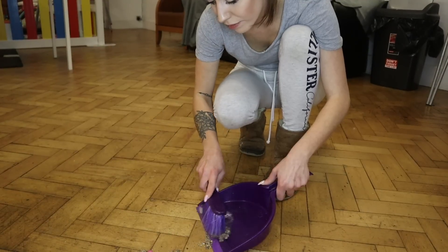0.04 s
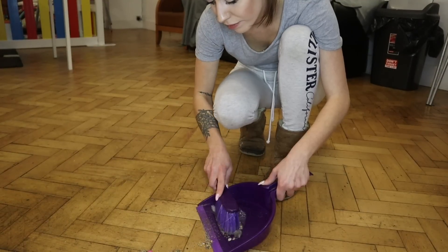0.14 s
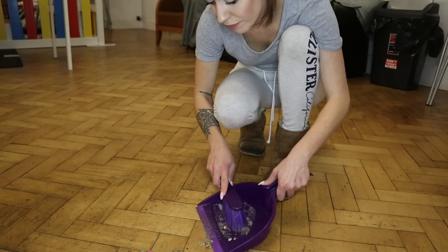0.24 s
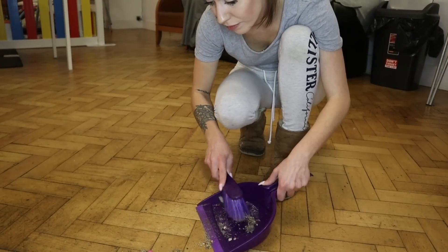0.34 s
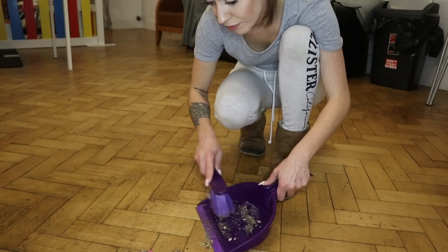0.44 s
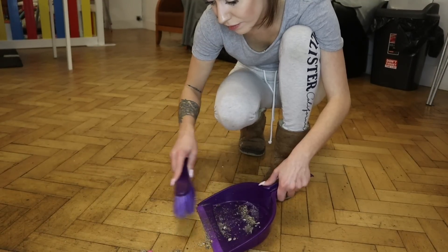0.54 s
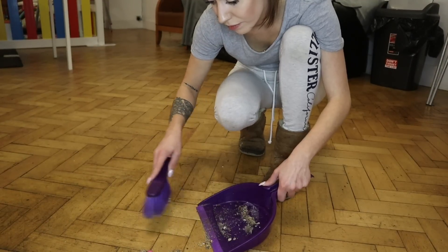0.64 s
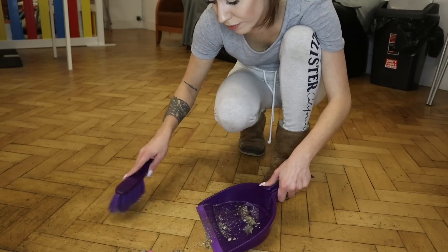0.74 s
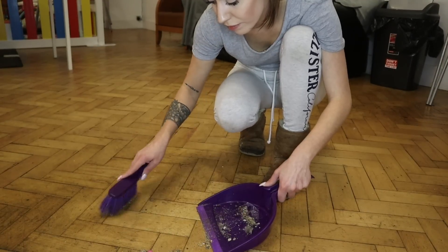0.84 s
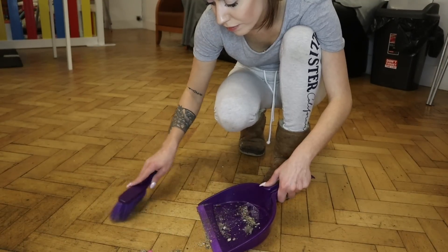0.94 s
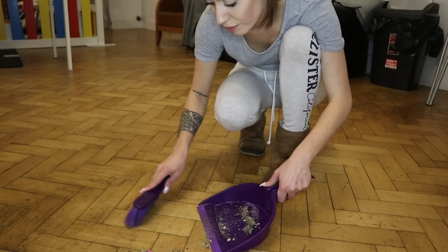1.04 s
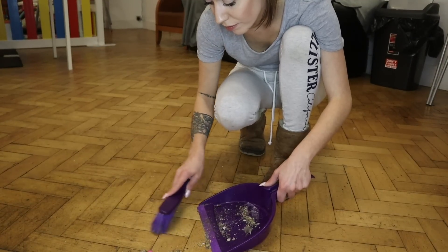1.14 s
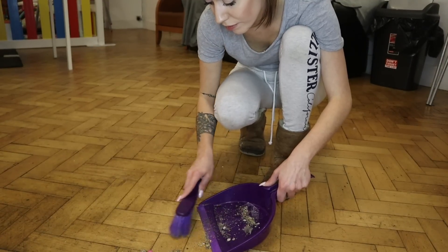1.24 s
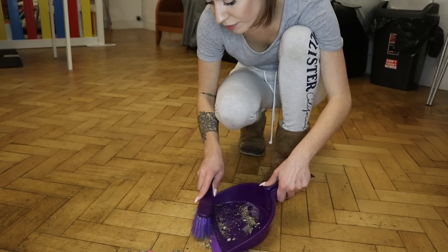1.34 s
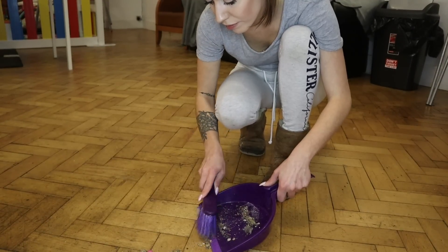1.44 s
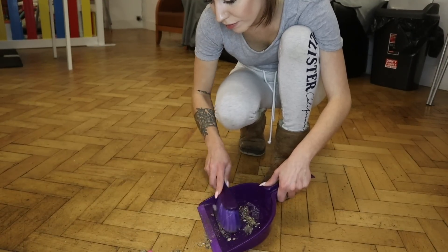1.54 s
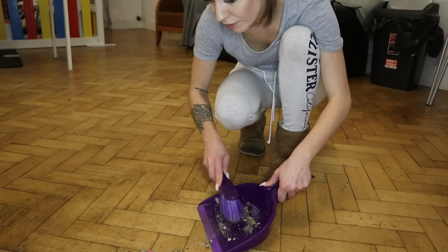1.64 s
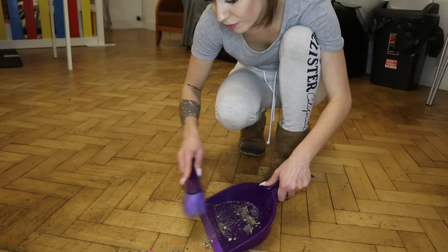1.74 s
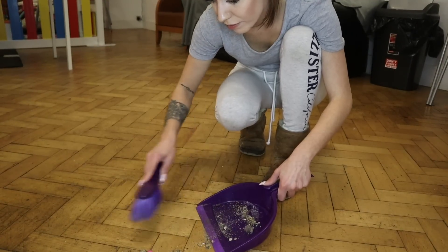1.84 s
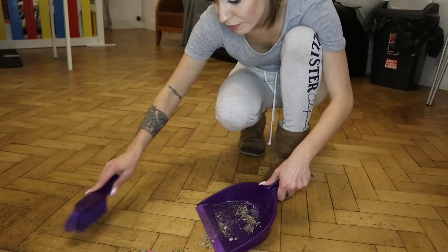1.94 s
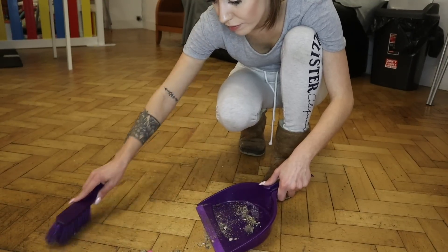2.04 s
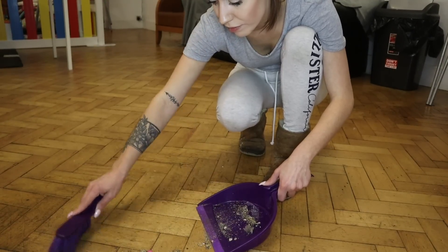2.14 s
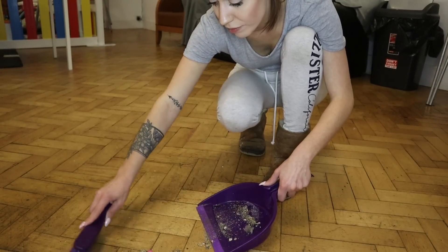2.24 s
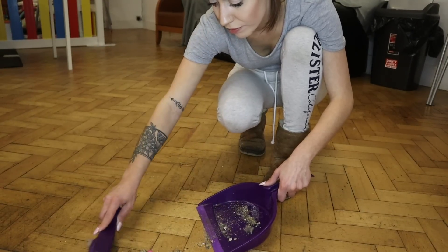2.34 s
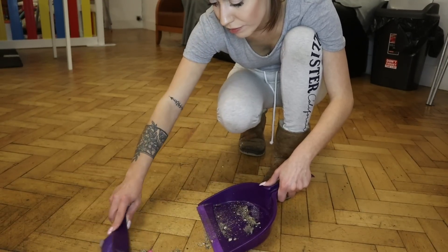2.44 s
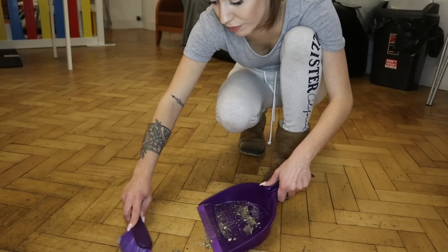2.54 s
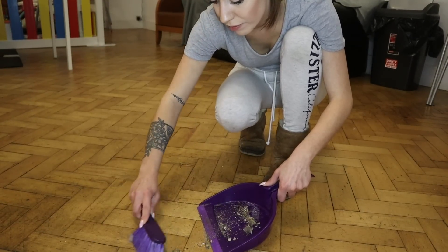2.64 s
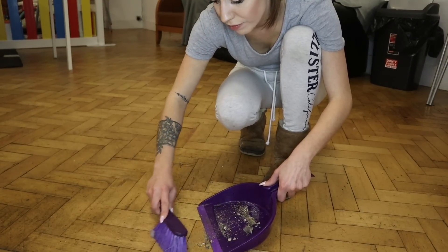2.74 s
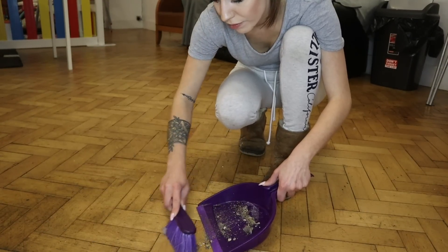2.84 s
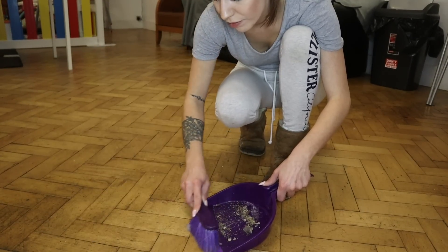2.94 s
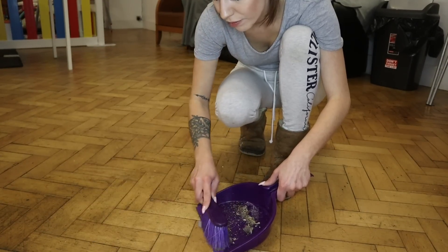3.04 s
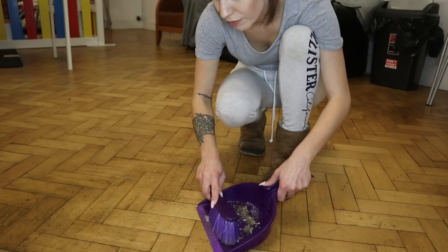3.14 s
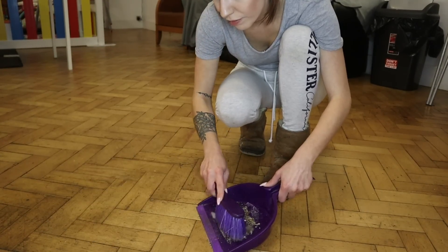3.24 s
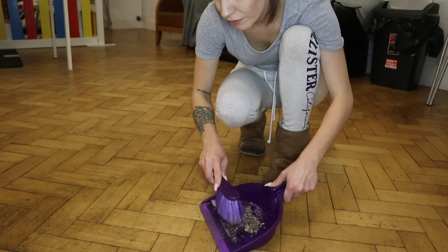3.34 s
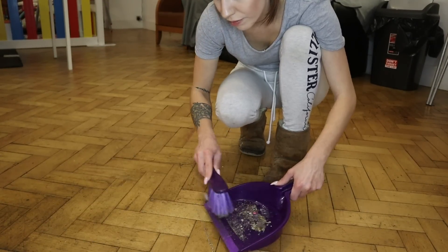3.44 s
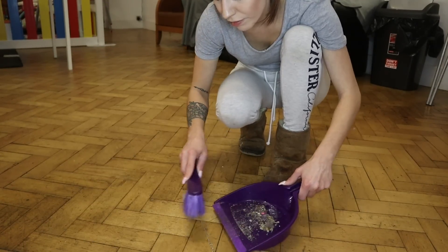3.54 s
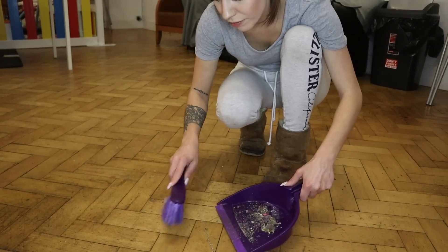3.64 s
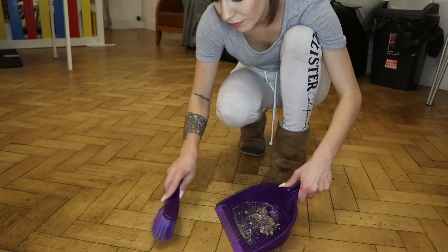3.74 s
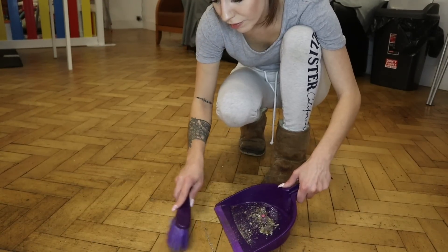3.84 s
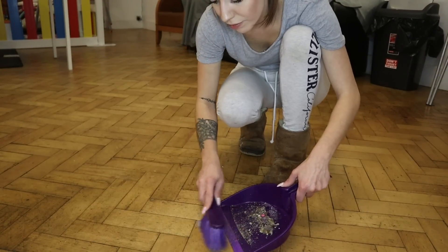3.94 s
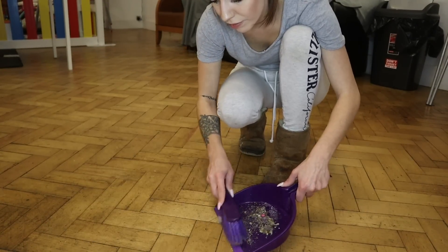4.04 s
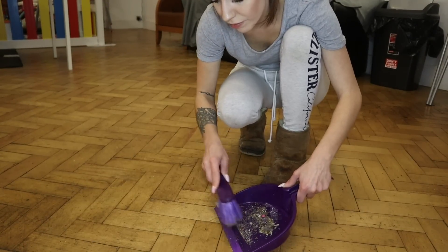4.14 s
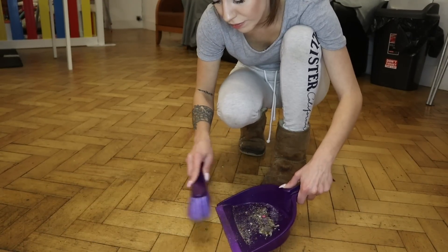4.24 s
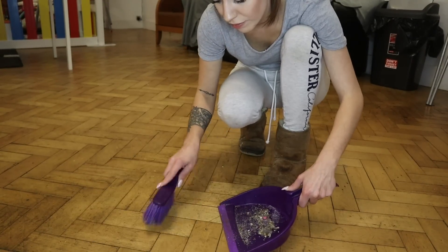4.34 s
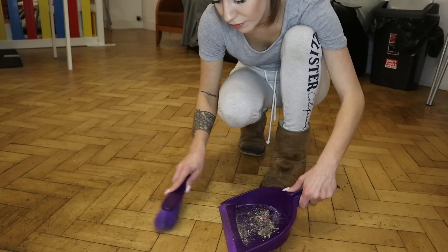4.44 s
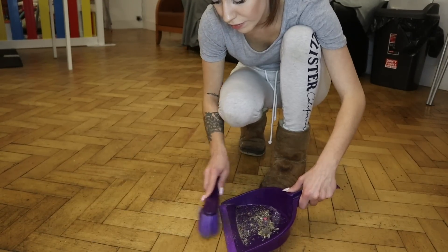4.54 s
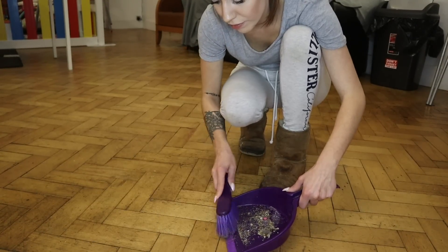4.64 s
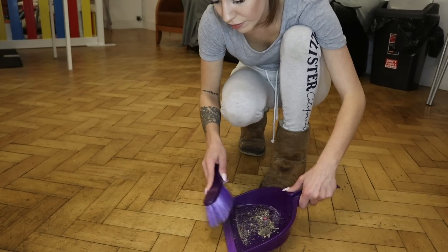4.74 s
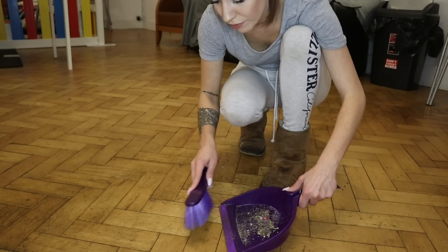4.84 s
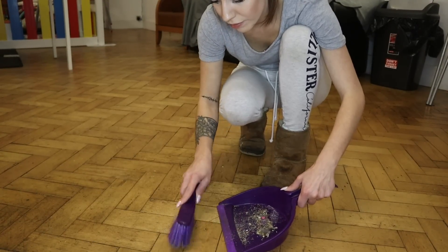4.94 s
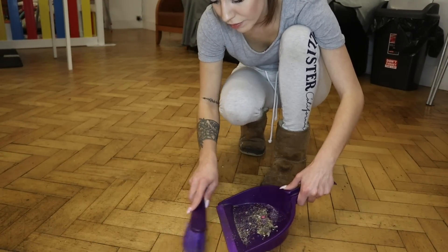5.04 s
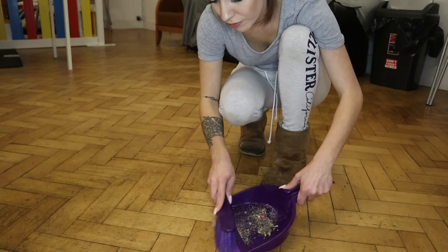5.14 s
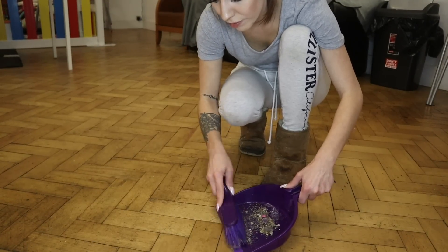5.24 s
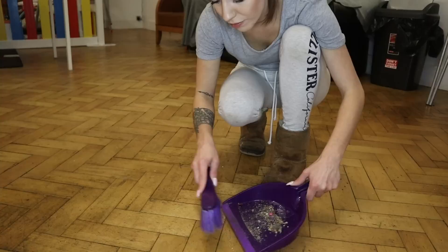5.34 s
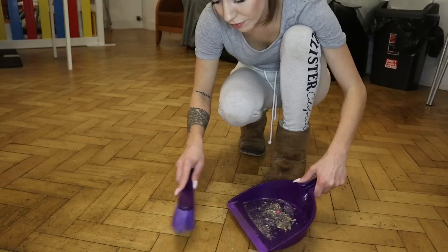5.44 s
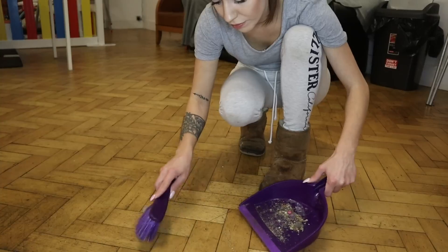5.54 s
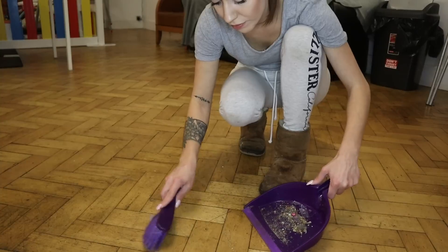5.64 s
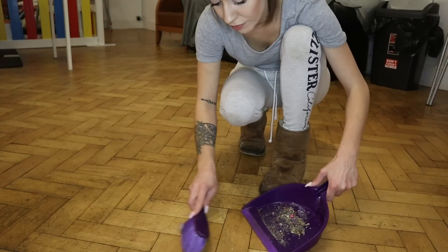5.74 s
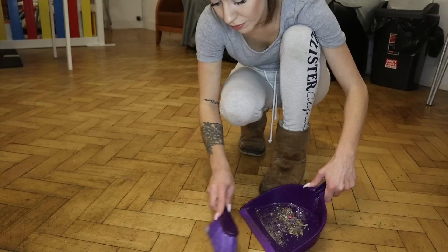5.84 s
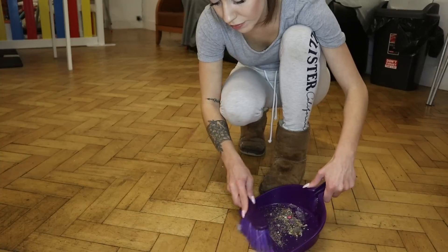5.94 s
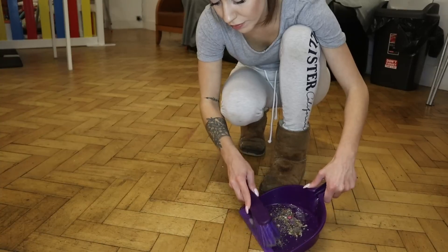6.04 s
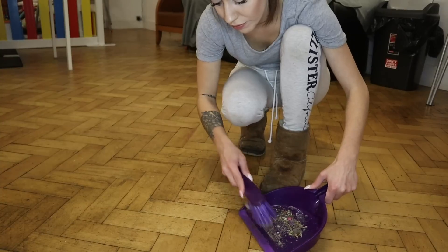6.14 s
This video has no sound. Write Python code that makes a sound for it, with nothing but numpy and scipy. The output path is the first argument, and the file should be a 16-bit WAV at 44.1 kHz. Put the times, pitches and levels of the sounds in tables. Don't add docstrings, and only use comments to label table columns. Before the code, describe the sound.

Close stereo sound of a hand brush sweeping grit on a wooden floor into a plastic dustpan. A stroke is already moving at the start; around 0.2 s the bristles flick and stones crack brightly against the pan, the loudest moment, with grains settling until 0.5. After a lull, a loud knock at 0.96 opens a swelling hiss to 1.4, then a short dab with clicks near 1.6. A bristly tap at 2.15 leads into a long soft pull with a few ticks. At 3.05-3.3 a hard landing brings heavy rattle and stone clatter. Lighter strokes follow: a soft double knock at 3.8 with a flick at 4.15, a firm dry knock at 4.5 with a bright flick at 4.75, a short pull at 5.1, and a last swish from 5.7 to 6.2. The room responds briefly; quiet air, a wavering far engine around 1.4-2.5 and low traffic rumble lie beneath.

```python
import sys
import numpy as np
from scipy import signal
from scipy.io import wavfile

SR = 44100
rng = np.random.default_rng(int(sys.argv[2]) if len(sys.argv) > 2 else 0)


def file_out(sig):
    cols = np.atleast_2d(sig).T
    lim = np.clip(cols, -1, 1)
    pcm = np.round(lim * 32767).astype(np.int16)
    wavfile.write(sys.argv[1], SR, pcm)


def nominal_scale(level):
    x = np.asarray(level, float) / 20
    return 10 ** x


N = 272538

# pitch_hz, width_hz, level_db
PAN_WALLS = [(780, 150, -36), (1350, 104, 4), (1800, 150, -5.5), (2150, 540, -1.5), (2830, 124, -0.5),
             (3600, 620, -4)]


def rms_one(x):
    return x / np.sqrt(np.mean(x ** 2) + 1e-20)


def peak_one(x):
    return x / np.max(np.abs(x))


def in_time(rows):
    s, *columns = np.transpose(rows)
    return [np.interp(np.arange(N) / SR, s, column) for column in columns]


def at_hz(points, hz):
    points = np.array(points)
    return np.interp(np.log(hz), np.log(points[:, 0]), points[:, 1])


def drift(rate_hz):
    r = np.exp(-80 * np.pi * rate_hz / SR)
    noise = rng.standard_normal(N // 40 + 2002)
    slow = signal.lfilter([1], [1, -2 * r, r * r], noise)[2000:]
    return np.interp(np.arange(N) / 40, np.arange(len(slow)), rms_one(slow))


def resonance(x, hz, width_hz):
    r = np.exp(-np.pi * width_hz / SR)
    poles = [1, -2 * r * np.cos(2 * np.pi * hz / SR), r * r]
    return signal.lfilter([(1 - r * r) / 2, 0, (r * r - 1) / 2], poles, x + 1e-18)


def band(x, low_hz, high_hz):
    edges_hz = [low_hz, min(high_hz, .45 * SR)]
    return signal.sosfilt(signal.butter(2, edges_hz, "band", fs=SR, output="sos"), x)


def pair(mid, side, side_db):
    return mid + nominal_scale(side_db) * side * [[1], [-1]]


def add(out, s, sound, pan_db, lag):
    left = round(s * SR)
    for side, start, gain_db in ((0, left, pan_db / 2), (1, left + lag, -pan_db / 2)):
        out[side, start:start + sound.shape[1]] += nominal_scale(gain_db) * sound[side, :N - start]


def swells(rows, floor_db):
    t = np.arange(0, N + 16, 16) / SR
    power = nominal_scale(2 * floor_db)
    for start, end, start_db, end_db, rise, fall in rows:
        db = np.interp(t, [start, end + 1e-4], [start_db, end_db])
        before, after = np.maximum(start - t, 0), np.maximum(t - end, 0)
        power = power + nominal_scale(2 * (db - rise * before - fall * after))
    return np.interp(np.arange(N) / SR, t, 10 * np.log10(power))


def gestures():
    # lands_s, lifts_s, landing_hiss_db, lifting_hiss_db, fade_db_per_s
    pulls = [
        (0.0, 0.183, -61, -34.5, 58),
        (0.953, 1.43, -55, -44, 150),
        (1.582, 1.642, -47, -42.5, 86),
        (2.27, 3.04, -56.5, -46.5, 100),
        (3.062, 3.385, -35, -40.5, 112),
        (3.817, 4.198, -54, -46, 71),
        (4.546, 4.72, -45, -43.5, 92),
        (5.1, 5.3, -50.5, -51, 99),
        (5.71, 6.179, -52, -44, 87),
    ]
    # start_s, hiss_db, grit_db, rise_db_per_s, fall_db_per_s
    flicks = [(0.076, -41.5, -39, 500, 38), (0.203, -26, -24.5, 153, 363), (0.286, -45, -45, 253, 700),
              (1.41, -39.5, -33, 600, 139), (1.548, -37, -40, 200, 97), (1.572, -37, -38, 200, 700),
              (1.604, -47.5, -37, 1500, 52), (1.632, -29, -28, 500, 700), (2.305, -45.5, -37, 107, 206),
              (2.872, -42.5, -41, 1200, 296), (3.085, -40, -26, 282, 200), (3.266, -28.5, -41, 218, 182),
              (4.088, -48, -40, 600, 65), (4.144, -30, -35, 152, 263), (4.685, -37.5, -38, 500, 60),
              (4.747, -25.5, -37.5, 600, 326), (4.997, -48, -39.5, 400, 224), (5.25, -42, -56, 146, 154),
              (5.291, -48, -36, 302, 110), (5.317, -35.5, -38, 161, 500), (5.71, -42, -33.5, 700, 500),
              (6.1, -35.5, -40, 175, 65), (6.128, -34.5, -38, 200, 900), (6.164, -51, -50, 900, 903)]
    # start_s, grit_db, boards_db, fall_db_per_s
    jolts = [(0.0, -40.5, -67, 78), (0.964, -40, -41, 350), (1.4, -37, -39.5, 322),
             (2.153, -32, -33.5, 355), (3.057, -37, -33.5, 200), (3.142, -25, -35, 51),
             (3.73, -57, -68, 53), (3.814, -32, -34.5, 251), (3.891, -33.5, -41, 106),
             (4.506, -27.5, -42, 1300), (4.515, -35.5, -45, 109), (5.077, -28.5, -33, 800),
             (5.705, -31.5, -38.5, 133), (5.727, -34, -38, 480)]
    # start_s, grit_db, boards_db, rise_db_per_s, fall_db_per_s
    slides = [(0.25, -26, -50, 100, 68), (0.53, -44.5, -90, 300, 81), (1.0, -39, -53, 900, 64),
              (1.645, -33, -48, 900, 110), (3.95, -41, -57, 300, 156), (2.2, -39, -39.5, 500, 49),
              (2.56, -62, -43, 74, 43), (2.62, -46.5, -64, 45, 0), (3.27, -27, -60, 133, 68),
              (1.8, -47, -48, 100, 53), (4.39, -56, -65, 157, 90), (4.57, -46, -44, 300, 200),
              (5.15, -40.5, -38.5, 200, 136), (5.37, -45, -40.5, 80, 400), (5.42, -51.5, -61, 200, 13),
              (5.894, -40.5, -43.5, 50, 130)]
    land_db_per_s, jolt_db_per_s = 800, 3500
    jolt_hiss_db, flick_drag_db = -12, -14.5
    roll_db, roll_fade_db_per_s = -51, 110
    rub_db, rub_fade_db_per_s = -50, 31

    hiss = [(a, b, a_db, b_db, land_db_per_s, fade) for a, b, a_db, b_db, fade in pulls]
    hiss += [(s, s, db, db, up, down) for s, db, _, up, down in flicks]
    for s, db, _, down in jolts:
        tips_db = db + jolt_hiss_db
        hiss.append((s, s, tips_db, tips_db, jolt_db_per_s, down + land_db_per_s / 2))

    heap = [(s, db, db + flick_drag_db, up, down) for s, _, db, up, down in flicks]
    heap += [(s, db, low_db, jolt_db_per_s, down) for s, db, low_db, down in jolts]
    heap += list(slides)
    roll = [(a, b, roll_db, roll_db, land_db_per_s, roll_fade_db_per_s) for a, b, *_ in pulls]
    rub = [(a, b, rub_db, rub_db, land_db_per_s, rub_fade_db_per_s) for a, b, *_ in pulls]
    roll += [(s, s, db, db, up, down) for s, db, _, up, down in heap]
    rub += [(s, s, db, db, up, down) for s, _, db, up, down in heap]
    return swells(hiss, -78), swells(roll, -71), swells(rub, -61)


def contacts(per_s, spread_db):
    happens = rng.random(N) < per_s / SR
    size = nominal_scale(spread_db * np.minimum(rng.exponential(1, N), 5)) * happens
    return size * rng.choice([-1, 1], (2, N))


def coloured(x, spectrum, patchy_db, reach_db, dull_db, shift):
    # pitch_hz, difference_db
    pair_width = [(300, -23), (700, -12.5), (1400, -8), (2500, -1), (5000, -0.5), (9000, 2.5), (14000, 4)]
    lowest, highest = spectrum[1][0], spectrum[-2][0]
    edges = lowest * .7 * 2 ** np.arange(0, np.log2(highest / lowest) + 1.2, .4)
    out = 0
    for k, (low, high) in enumerate(zip(edges, edges[1:])):
        hz = np.sqrt(low * high)
        own = (-1) ** k * np.roll(x, shift * k, axis=1)
        gain = nominal_scale(at_hz(spectrum, hz) + patchy_db * drift(8.2))
        mid, side = band(own, low, high)
        mid = mid * nominal_scale(dull_db * (hz > 7500))
        out = out + gain * pair(mid, side, at_hz(pair_width, hz) + reach_db)
    return out / np.std(out.mean(axis=0))


def bristles(level_db):
    # pitch_hz, level_db per Hz
    tip_spectrum = [(1060, -46), (1800, 6.5), (2360, -13), (2540, 4.5), (2830, 32), (3390, 3), (5670, 6.5),
                    (6550, -0.5), (8590, 1), (11300, 4), (13700, -10), (15600, -31)]
    # start_s, extra_difference_db, sum_treble_db
    spread = [(0, -6, -3), (.9, 5, -5.5), (1.2, 3.5, 4), (1.5, -4.5, -3), (2.16, 6.5, -2), (2.21, 8, -11),
              (2.42, 9, 0), (2.52, 9, 3), (2.8, 1.5, -2), (3.05, -4, -2), (3.7, 2.5, -3), (4.1, -1.5, 0.5),
              (4.5, 4, 1), (4.75, -2.5, -1.5), (5.1, -1, -4), (5.3, 0.5, 3.5), (5.8, 3.5, 3.5),
              (6.18, 0.5, 1)]
    tips = contacts(per_s=12000, spread_db=3.0)
    reach_db, dull_db = in_time(spread)
    hiss = coloured(tips, tip_spectrum, patchy_db=1.5, reach_db=reach_db, dull_db=dull_db, shift=331)
    return nominal_scale(level_db - 1.0) * hiss


def grit(level_db):
    # pitch_hz, level_db per Hz
    grain_spectrum = [(410, -60), (700, -0.5), (1010, -9.5), (1080, -2.5), (1560, 7), (2160, -2.5),
                      (3270, 1.5), (4320, -13.5), (7000, -13.5), (9100, -97), (15400, -120)]
    grains = contacts(per_s=2000 * nominal_scale(4.0 * drift(35)), spread_db=1.5)
    walls = 0
    for k, (hz, width_hz, db) in enumerate(PAN_WALLS):
        walls = walls + (-1) ** k * nominal_scale(db) * resonance(grains, hz, 1.1 * width_hz)
    walls = pair(*rms_one(walls), -1.3)
    rattle = coloured(grains, grain_spectrum, patchy_db=1.6, reach_db=4.0, dull_db=15, shift=0)
    return nominal_scale(level_db - 5.5) * (rattle + 0.16 * walls)


def drag(level_db):
    # pitch_hz, width_hz, level_db
    board_modes = [(567, 270, -0.5), (760, 263, 0), (940, 370, -5), (356, 430, -8)]
    rub = contacts(per_s=1200 * nominal_scale(3.0 * drift(30)), spread_db=1.0)
    boards = 0
    for k, (hz, width_hz, db) in enumerate(board_modes):
        boards = boards + (-1) ** k * nominal_scale(db) * resonance(rub, hz, width_hz)
    return nominal_scale(level_db - 3.1) * pair(*rms_one(boards), -11.5)


def landings():
    # start_s, peak_db, knock_hz, tips_db, thud_db
    touchdowns = [
        (0.962, -9.5, 1380, -36, -14.5),
        (2.1495, -18, 2200, -2, -18),
        (3.052, -15, 891, -10, -20),
        (3.139, -16, 2980, -5, -17),
        (3.807, -17.5, 1510, -20, -20),
        (3.823, -19, 1600, -16, -3),
        (3.892, -18, 2068, -5, -7),
        (4.5035, -11.5, 2110, -21, -30),
        (5.075, -23, 1600, -28, -11),
        (5.705, -18.5, 1607, -36, -25),
    ]
    out, t = np.zeros((2, N)), np.arange(2048) / SR
    swell = t * 1000 / 3.74
    for s, peak_db, hz, tips_db, thud_db in touchdowns:
        touch = rng.standard_normal((3, len(t))) ** 3
        touch = (touch[0] + 0.57 * touch[1:]) * swell ** 0.94 * np.exp(-swell ** 3)
        body = band(band(touch, 0.59 * hz, 2.74 * hz), 330, 14600)
        knock = peak_one(resonance(touch, hz, 0.064 * hz) + 0.52 * body)
        tips = nominal_scale(tips_db - 1.5) * peak_one(band(touch, 4500, 12000))
        thud = nominal_scale(thud_db - 1.5) * peak_one(resonance(resonance(touch, 660, 340), 810, 330))
        lag = -1 if hz < 1000 else 2
        add(out, s - .0006, nominal_scale(peak_db - 4.5) * (knock + tips + thud), -1.5, lag=lag)
    return out


def stones():
    # start_s, peak_db, ring_hz, edge_db
    strikes = [(0.091, -10.5, 2940, -31), (0.143, -16.5, 2000, 0), (0.154, -9, 3200, -16),
               (0.174, -10, 3320, -5), (0.1838, 0.5, 3600, -24), (0.2, 2, 2420, -28),
               (0.213, -13, 2160, -20), (0.282, -3, 2870, -15.5), (0.296, -11.5, 2800, -15),
               (0.383, -15.5, 2780, -34), (1.398, -14, 3660, -21), (1.543, -17, 3670, -26),
               (1.554, -11, 4700, -22), (1.61, -16, 2790, -19), (1.63, -7, 3100, -33),
               (1.6545, -10.5, 3350, -18), (1.682, -17, 2900, -19), (2.869, -14, 3600, -21),
               (2.875, -19.5, 2530, -23), (3.085, -24, 1790, 3.5), (3.115, -17, 1710, -16),
               (3.17, -3.5, 3600, -10), (3.187, -5, 2880, -15), (3.261, -9, 3050, -29),
               (3.278, -10, 5440, -27), (3.372, -16.5, 3350, -18), (4.992, -19.5, 2616, -14),
               (5.724, -10.5, 2480, -41), (6.162, -15, 3900, -26)]
    # start_s, peak_db, ring_hz
    skips = [(0.022, -22, 2970), (0.077, -19, 2710), (0.477, -25, 2620), (0.5155, -20.5, 3000),
             (0.522, -26.5, 2680), (0.5328, -21, 2950), (1.282, -27, 2050), (1.406, -16.5, 3000),
             (1.459, -24, 3410), (1.779, -27.5, 3470), (1.845, -35, 5000), (0.446, -30, 4500),
             (2.679, -25.5, 2360), (2.695, -21, 3860), (2.8353, -23, 3780), (2.845, -21, 2416),
             (3.066, -15, 1975), (3.107, -34, 1880), (3.16, -11, 3600), (3.201, -23, 1930),
             (3.278, -37, 1850), (3.398, -19.5, 1940), (3.426, -18.5, 3640), (3.55, -28, 1488),
             (3.679, -28.5, 2644), (3.73, -25, 2740), (4.381, -28.5, 2420), (1.53, -24, 3000),
             (1.564, -25, 3300), (1.601, -21, 4200), (1.624, -18, 5000), (1.667, -22, 3500),
             (1.703, -26, 6000), (0.19, -19, 2300), (0.195, -10, 3000), (0.201, -11, 2000),
             (0.169, -15, 2200), (0.24, -23, 2000), (0.27, -23, 2100), (5.01, -29, 3480),
             (5.022, -30, 2050), (5.287, -17, 3630), (5.585, -35, 2403)]
    skip_edge_db = -20.5
    out, t = np.zeros((2, N)), np.arange(1024) / SR
    hits = list(strikes) + [(*skip, skip_edge_db) for skip in skips]
    chances = rng.random((len(hits), 2, len(t) + 2))
    for (s, peak_db, hz, edge_db), u in zip(hits, chances):
        click = .55 * (u[:, 2:] - .5) * (t > .0002) * np.exp(-t / .0025)
        click[:, 0] = 1
        upper_hz = hz * (1.3 + .5 * u[0, 0])
        ring = resonance(click, hz, .35 * hz) + .7 * resonance(click, upper_hz, .45 * hz)
        for mode_hz, width_hz, db in PAN_WALLS:
            ring += 0.73 * nominal_scale(db) * resonance(click, mode_hz, 0.82 * width_hz)
        ring = band(ring, 0.43 * hz, 2.1 * hz)
        edge = nominal_scale(edge_db + 9.5) * peak_one(band(click, 4500, 10500))
        strike = nominal_scale(peak_db - 1.5) * (peak_one(ring) + edge)
        add(out, s + 0.001052, strike, -2.2, lag=-round(2 * u[0, 1]))
    return out


def taps():
    # start_s, peak_db, pitch_hz
    spots = [(0.076, -27, 1350), (0.23, -29, 1310), (0.32, -31, 1450), (0.522, -28, 1410),
             (1.399, -28, 1460), (1.41, -32, 1420), (1.61, -23, 1800), (3.055, -24, 743), (3.068, -31, 700),
             (3.086, -25, 775), (3.089, -20, 1510), (3.141, -18.5, 744), (3.153, -17, 1500),
             (3.189, -19, 730), (3.203, -24, 1500), (3.204, -27, 700), (3.212, -34, 760), (3.303, -30, 755),
             (3.333, -22, 1530), (3.8085, -21.5, 570), (3.821, -28, 560), (3.828, -30, 684),
             (3.895, -29, 810), (3.894, -21, 2090), (3.939, -26, 2880), (3.941, -34.5, 644),
             (0.961, -23.5, 2050), (0.9615, -31, 750), (0.961, -25, 3500), (2.152, -31, 1500),
             (2.152, -24.5, 3180), (2.193, -32, 2600), (3.1405, -14, 1490), (4.505, -16, 3270),
             (4.505, -23, 2000), (4.505, -29, 1410), (4.506, -30, 790), (4.55, -24, 1990),
             (4.552, -30.5, 805), (4.993, -33.5, 1440), (3.551, -31, 1440), (5.077, -24, 1350),
             (0.214, -17, 2200), (0.2005, -6.5, 1900), (0.185, -15, 1490), (5.075, -23.5, 1670),
             (5.08, -25.5, 900), (5.129, -30.5, 494), (5.128, -30, 1590), (5.148, -36, 745),
             (5.155, -32, 1550), (5.289, -32, 1500), (5.317, -28, 1754), (5.331, -28, 1670)]
    width_share = 0.21
    out, t = np.zeros((2, N)), np.arange(1536) / SR
    for (s, peak_db, hz), u in zip(spots, rng.standard_normal((len(spots), 3, len(t)))):
        click = (u[0] + 0.61 * u[1:]) * np.exp(-t / 0.00071)
        note = resonance(click, hz, width_share * hz)
        note = resonance(note, 1.08 * hz, 2.2 * width_share * hz)
        add(out, s, nominal_scale(peak_db) * peak_one(note), -1.5, lag=1)
    return out


def bumps():
    # start_s, peak_db, pitch_hz
    shifts = [
        (2.199, -41, 204.4),
        (5.713, -34, 313),
        (5.916, -40, 279),
    ]
    out = np.zeros((2, N))
    for s, peak_db, hz in shifts:
        push = np.zeros((2, 4096))
        push[:, :300] = np.hanning(300) * rng.standard_normal(300)
        thump = resonance(resonance(push, hz, 90), hz, 110)
        add(out, s, nominal_scale(peak_db) * peak_one(thump), -.6, lag=0)
    return out


def room(x):
    t60_s, wall_cut_hz = 0.38, 2300
    out, dull = np.zeros((2, N)), np.exp(-2 * np.pi * wall_cut_hz / SR)
    lags = (rng.uniform(.011, .04, 16) * SR).astype(int)
    for k, lag in enumerate(lags):
        loop, gain, state = x.copy(), nominal_scale(-60 * lag / SR / t60_s), [0.]
        for i in range(lag, N, lag):
            back, state = signal.lfilter([gain * (1 - dull)], [1, -dull], loop[i - lag:i], zi=state)
            loop[i:i + lag] += back[:N - i]
        out[k % 2] += (loop - x) * (-1) ** (k // 2)
    return out


def hush():
    # pitch_hz, level_db
    air = [(15, -35), (25, -28), (113, 1.5), (525, -3), (649, -2.5), (1260, -4), (1510, -3), (3260, -23),
           (6330, -29), (8690, -35), (11000, -30), (12600, -38), (14000, -63)]
    # pitch_hz, likeness (1 = identical)
    likeness = [(40, .99), (125, 1), (300, 0.71), (1000, 0.03), (4000, 0.017)]
    out, edges = 0, 25 * 2 ** np.arange(0, 9.3, .5)
    white = rng.standard_normal((2, 2, N))
    for k, (low, high) in enumerate(zip(edges, edges[1:])):
        hz = np.sqrt(low * high)
        mid, side = band(white[k % 2], low, high)
        alike = np.clip(at_hz(likeness, hz), -1, 1)
        both = np.sqrt(1 + alike) * mid + np.sqrt(1 - alike) * side * [[1], [-1]]
        out = out + nominal_scale(at_hz(air, hz)) * both
    return nominal_scale(-46.5 - 1.0) * rms_one(out)


def traffic():
    # start_s, firing_hz, firing_db
    engine = [(0.0, 126.3, -76), (0.65, 126, -65), (1.08, 126.8, -69), (1.39, 122, -46.5),
              (1.56, 121.5, -49.5), (1.7, 119.8, -45.5), (1.86, 119.7, -51), (1.98, 119.9, -52.5),
              (2.15, 119.7, -48.5), (2.26, 119, -48.5), (2.45, 117, -46.5), (2.7, 121.2, -65.5),
              (4.75, 118, -59), (6.18, 120.3, -65)]
    # start_s, deep_rumble_db, upper_rumble_db
    passes = [
        (0.21, -64, -60),
        (1.95, -49, -47),
        (2.749, -44, -56),
        (3.4, -48.5, -55.5),
        (3.9, -50.5, -56),
        (4.43, -50.5, -54),
        (4.83, -52, -53.5),
        (5.12, -64, -57),
        (5.45, -47, -52.5),
        (6.05, -47, -53),
    ]
    pass_db_per_s, street_db = 31, -82
    hz, firing_db = in_time(engine)
    half_db = -59.5 + 0.45 * (firing_db - firing_db.mean())
    turn = 2 * np.pi * np.cumsum(hz + 1.03 * drift(2.96)) / SR
    drone = nominal_scale(firing_db + 2.5 + 2.0 * drift(6.7)) * (np.sin(turn) + 0.25 * np.sin(1.8 * turn))
    drone += nominal_scale(half_db + 0.5 + 3.7 * drift(9.5)) * np.sin(turn / 2 + 1.0 * drift(9.9))

    deep_rows = [(s, s, db, db, pass_db_per_s, pass_db_per_s) for s, db, _ in passes]
    upper_rows = [(s, s, db, db, pass_db_per_s, pass_db_per_s) for s, _, db in passes]
    noise = rng.standard_normal((2, N))
    deep = rms_one(resonance(resonance(noise[0], 39, 9.1), 39, 9.1))
    upper = rms_one(resonance(resonance(noise[1], 79.0, 28), 79.0, 28))
    rumble = nominal_scale(swells(deep_rows, street_db)) * deep
    rumble += nominal_scale(swells(upper_rows, street_db) - 1.5) * upper
    side = rms_one(band(noise[1, ::-1], 25, 90))
    return pair(drone + rumble, side, -76)


def scene():
    hiss_db, grit_db, drag_db = gestures()
    strokes = bristles(hiss_db) + grit(grit_db) + drag(drag_db)
    strokes = strokes * nominal_scale(np.array([[-.8], [.8]]))
    sweeping = strokes + landings() + stones() + taps() + bumps()
    return sweeping + nominal_scale(-18.5) * room(sweeping[0]) + hush() + traffic()


def low_pass(x):
    return signal.sosfilt(signal.butter(12, 16170, fs=SR, output="sos"), x)


def record(dry):
    limited = np.clip(dry, -.95, .95)
    dulled = signal.sosfilt(signal.butter(2, 15000, fs=SR, output="sos"), limited)
    dulled = signal.sosfilt(signal.cheby2(12, 40, 15950, fs=SR, output="sos"), dulled)
    return low_pass(dulled)


dry = scene()
out = record(dry)
file_out(out)
```